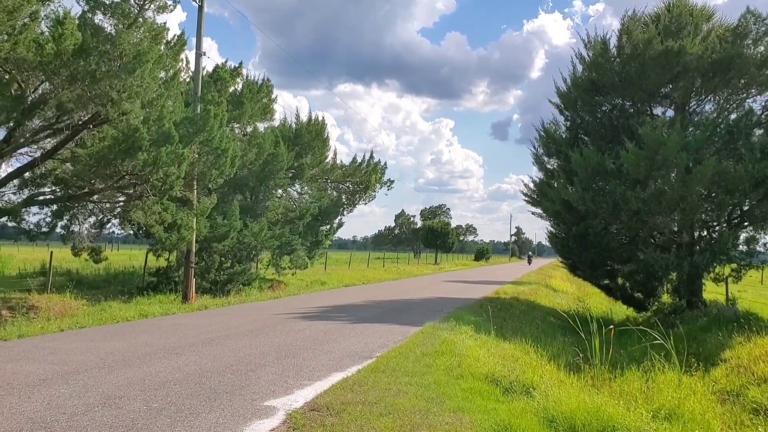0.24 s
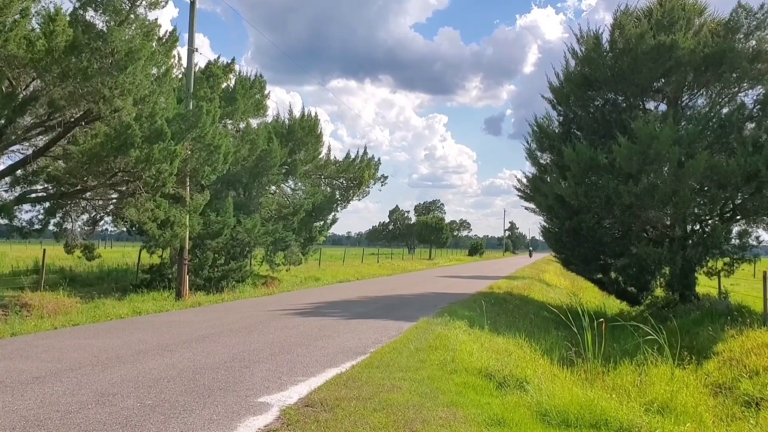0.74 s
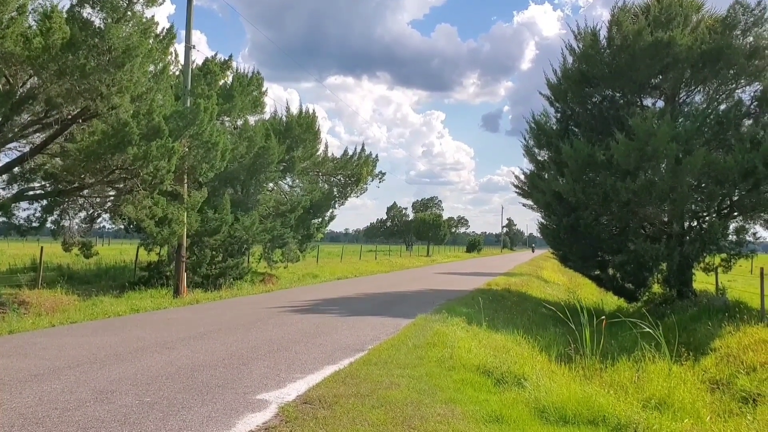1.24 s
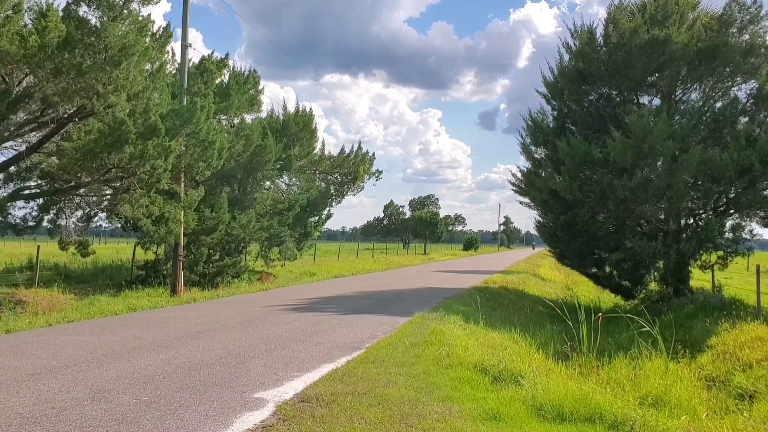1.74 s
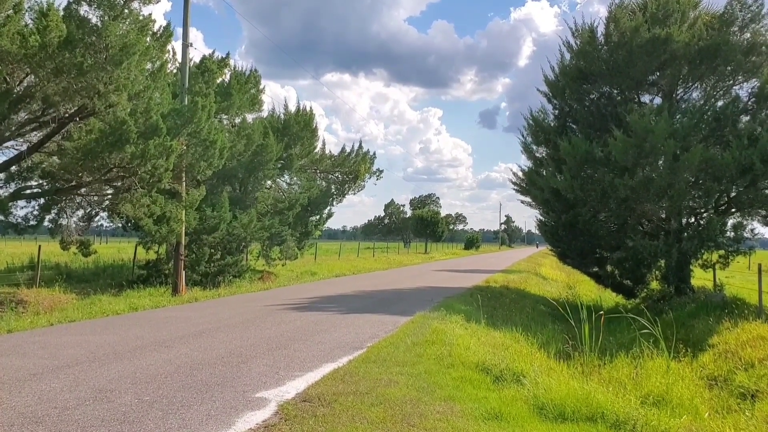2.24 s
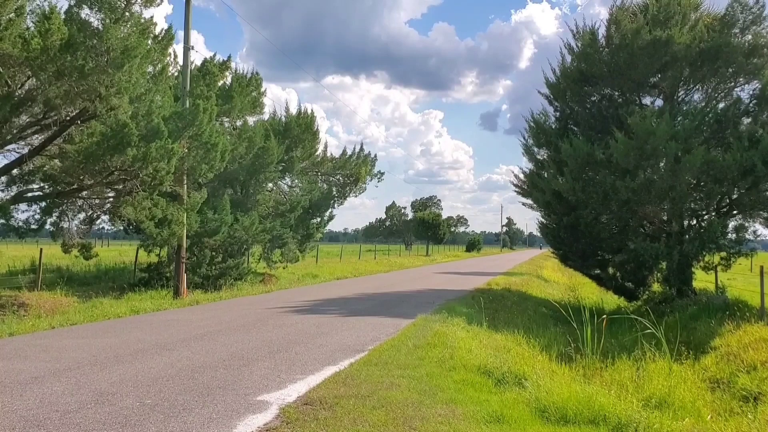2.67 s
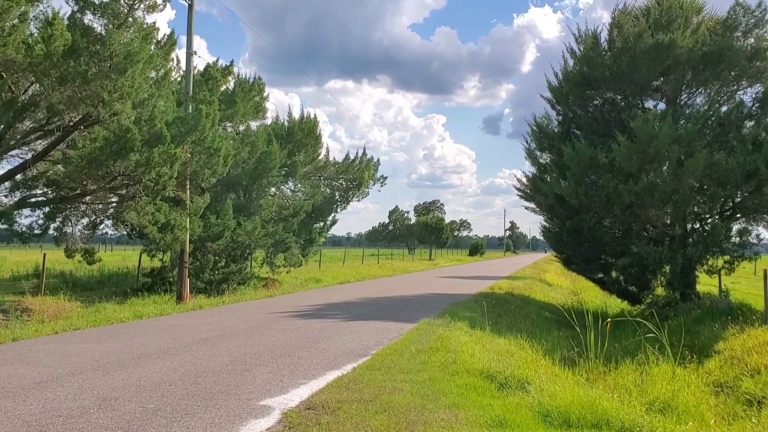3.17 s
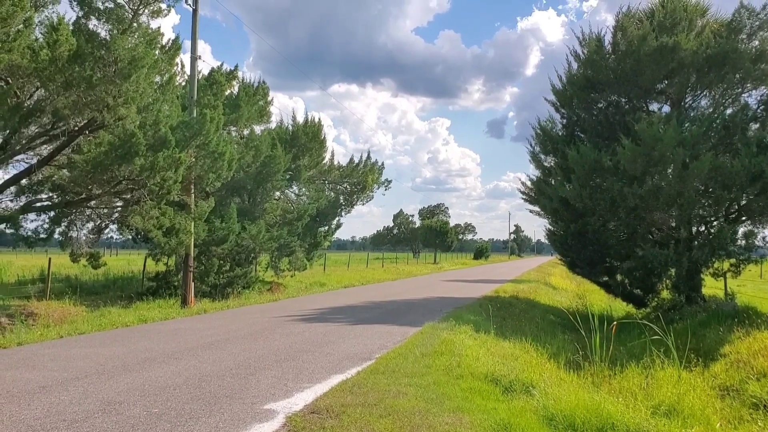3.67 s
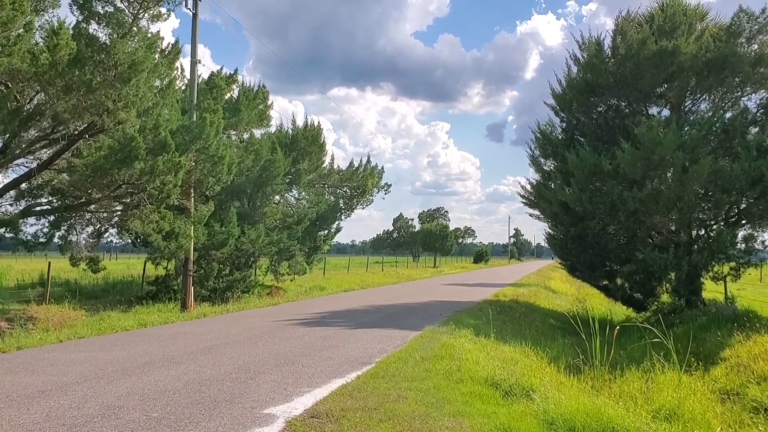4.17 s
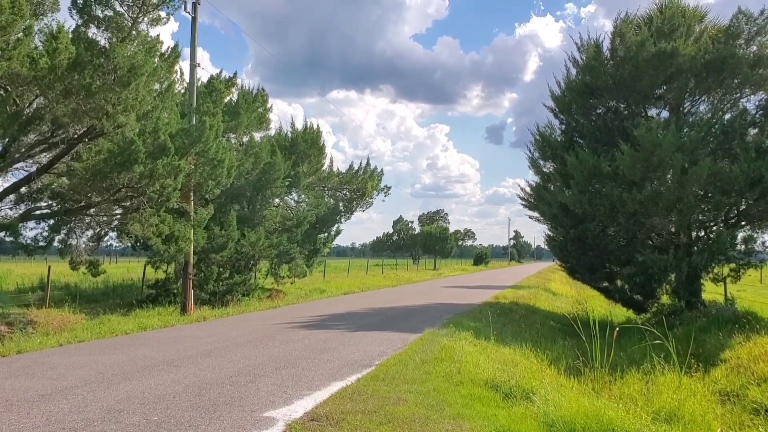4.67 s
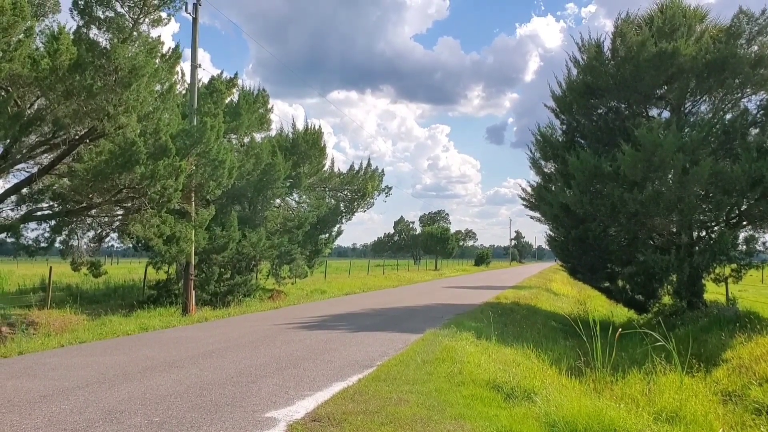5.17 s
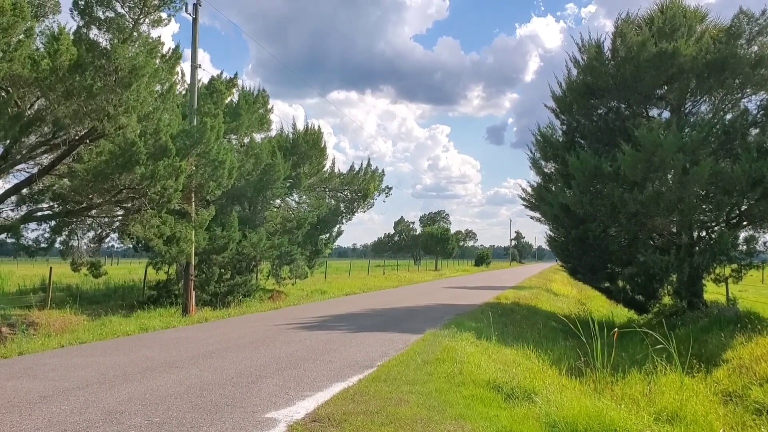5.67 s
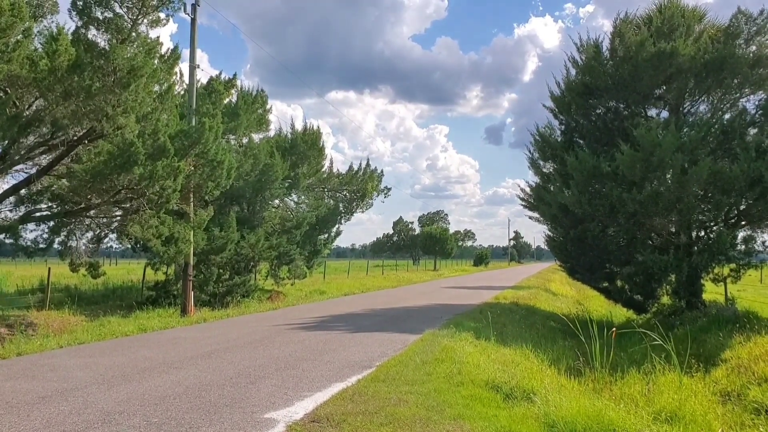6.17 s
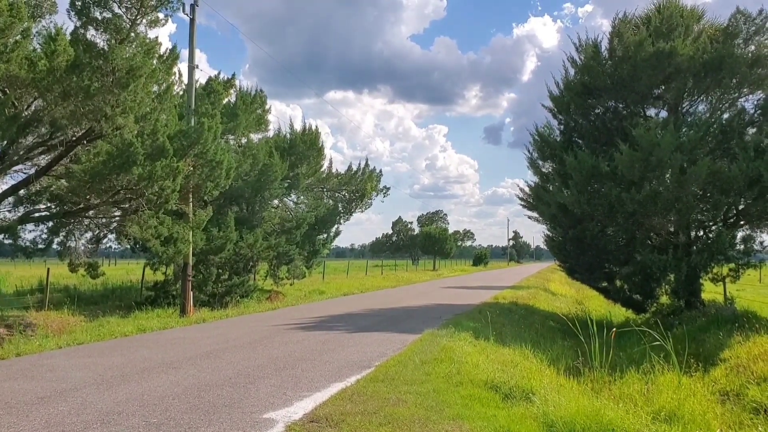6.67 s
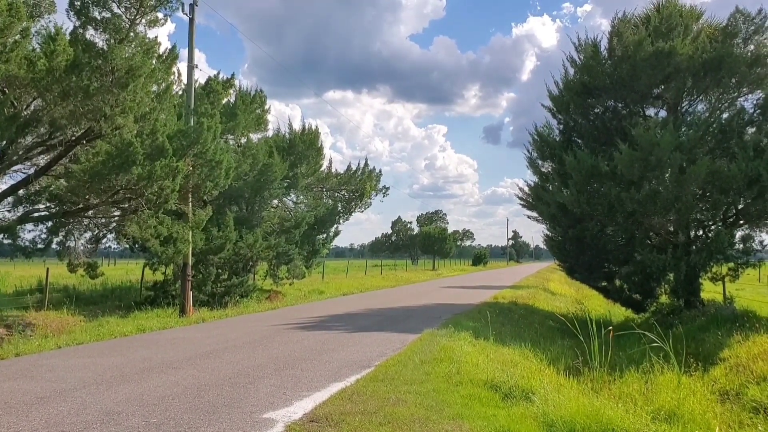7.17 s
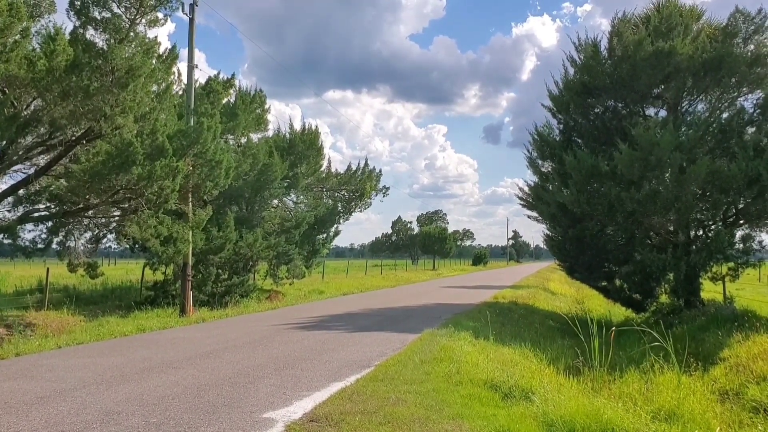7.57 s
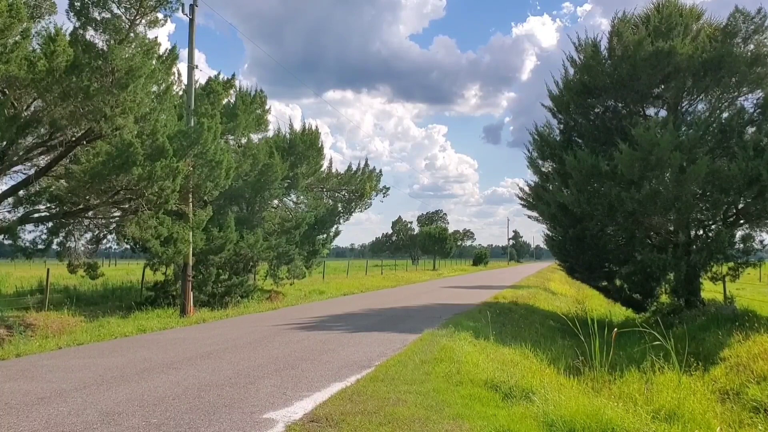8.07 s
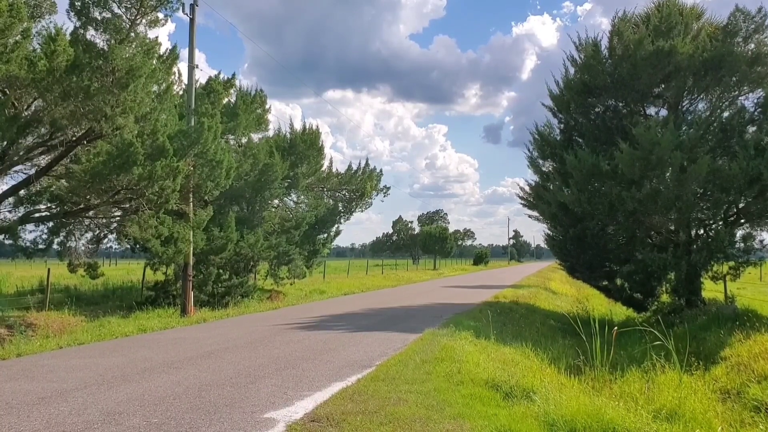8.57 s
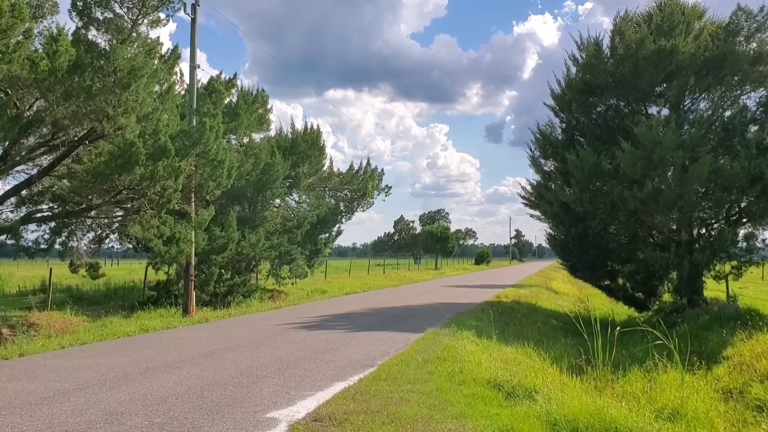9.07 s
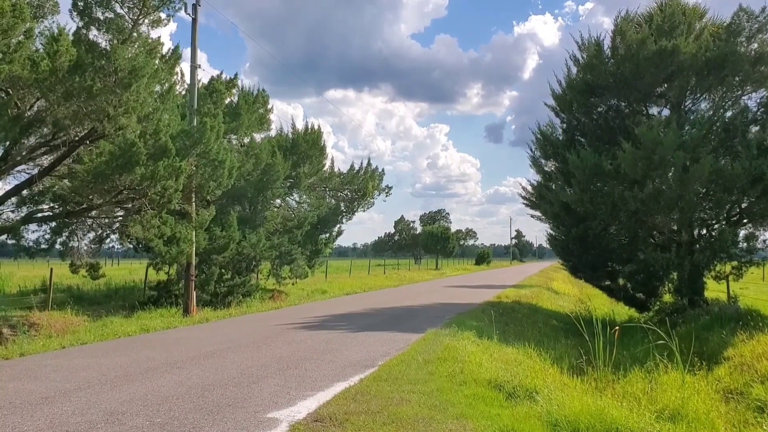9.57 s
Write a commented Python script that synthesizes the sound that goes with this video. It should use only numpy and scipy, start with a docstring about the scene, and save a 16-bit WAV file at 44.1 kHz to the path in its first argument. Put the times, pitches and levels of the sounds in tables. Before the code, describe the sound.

Motorcycle receding on a rural road: brief hard pull, popping overrun, sinking revs and distant burble, with insect buzz, gusts and a few bird whistles.

```python
"""Verge of a country road between trees, two microphone ports, a motorcycle riding away from about 35 m.
The twin pulls for a second, then the throttle shuts and the revs sink: the exhaust burbles and pops, coasts
smoothly and burbles again far off. It is built from drone orders, filtered firing pulses, puffs of noise and pops.
Gusts bump the ports as noise and single pushes; insects buzz in the grass as bands of noise, over faint air,
leaves and hiss; a bird whistles a few notes as gliding sines. The trees return a diffuse noise echo."""
import sys
import numpy as np
from scipy import signal
from scipy.fft import rfft, irfft, next_fast_len
from scipy.io import wavfile
from scipy.ndimage import uniform_filter1d, map_coordinates

SR = 44100
rng = np.random.default_rng(int(sys.argv[2]) if len(sys.argv) > 2 else 0)


def transcribe(signal):
    """Save signal, clipped to [-1, 1], as a 16-bit WAV file at the path in sys.argv[1]."""
    frames = np.atleast_2d(signal).T
    limited = np.clip(frames, -1, 1)
    pcm = np.round(limited * 32767).astype(np.int16)
    wavfile.write(sys.argv[1], SR, pcm)


N = 432621

# Meadow. Spectra of insects and distant air: pitch_hz [Hz], density_db [dB per Hz, relative]
INSECT_SPECTRUM = [(4410, -70), (7500, -44), (8110, -20.5), (8810, -14), (9260, -7), (9610, -1),
                   (10500, 3.5), (11200, -5.5), (11700, -34), (12000, -25.5), (15600, -55), (22000, -120)]
AIR_SPECTRUM = [(20, -9.5), (70, 5.5), (130, -1), (250, -18.5), (420, -31.5), (620, -23), (950, -43),
                (2000, -42.5), (4000, -40.5), (6000, -44.5), (9000, -44)]
# one lower buzzer, leaves and hiss: pitch_hz [Hz], density_db [dB per Hz, relative]
BUZZER_SPECTRUM = [(7600, -42.5), (8400, -6.0), (8850, -1), (9200, -32.5), (9800, -66)]
LEAF_SPECTRUM = [(300, -35.0), (800, -3.5), (3800, -9), (7000, -8.5), (12000, -29.0)]
HISS_SPECTRUM = [(11000, -58.0), (13000, -12.0), (15000, -9.5)]
# insect levels before flutter and panning: time_s [s], level_db [dB]
CHORUS_LEVELS = [(0, -61), (1.5, -59), (3.3, -54.5), (5, -56), (9.8, -57.5)]
BUZZER_LEVELS = [(7, -100), (7.5, -75.5), (8.3, -73.5), (9.8, -76)]

# Decay of the echo among the trees: pitch_hz [Hz], t60_s [s]
TREE_DECAY = [(200, .3), (1500, 0.44), (4000, .4), (10000, 0.068)]
# Bird whistles: start_s [s], length_s [s], start_hz [Hz], end_hz [Hz], peak_db [dB before flutter]
BIRD_NOTES = [(6.296, 0.17, 3316, 3200, -60), (6.457, 0.051, 3306, 3260, -61),
              (6.629, 0.072, 4690, 4570, -69.5), (6.68, 0.11, 4570, 4550, -54.5),
              (6.788, 0.072, 4610, 4540, -57), (6.797, 0.019, 3330, 3280, -63),
              (6.828, 0.097, 3547, 3636, -55), (6.93, 0.062, 2610, 2460, -68),
              (9.64, 0.085, 4990, 4870, -71.5)]

# Wind noise at the ports: pitch_hz [Hz], density_db [dB per Hz, relative]
BUFFET_SPECTRUM = [(15, -37), (35, -5), (65, 5), (100, 1), (150, -12.5), (250, -23.5), (500, -44.5),
                   (1200, -78.5)]
# Gusts on the ports: start_s [s], end_s [s], level_db [dB before flutter], left_minus_right_db [dB]
GUST_SPANS = [(3.34, 3.944, -44, -2), (5.535, 6.747, -42.5, -3.5), (8.905, 9.14, -42, -9)]
GUST_EDGE_DB_PER_S = 124
# Strongest buffets: centre_s [s], half_length_s [s, to 1/e], peak_db [dB], left_minus_right_db [dB]
GUST_BUFFETS = [(3.425, 0.05, -28, -31), (3.514, 0.027, -31, 21), (3.633, 0.048, -29, -36),
                (3.804, 0.056, -36.5, -17), (5.672, 0.028, -30.5, -35), (5.908, 0.031, -31, -13),
                (5.988, 0.035, -31, 13), (6.03, 0.043, -30.5, -21), (6.094, 0.045, -27.5, 22),
                (6.394, 0.021, -39, 4.5), (6.54, .05, -42, -6), (6.727, 0.025, -42, 7),
                (8.97, 0.072, -39, -14)]
# Eddies that hit a port: centre_s [s], peak_db [dB], left_minus_right_db [dB], half_length_s [s, to zero]
EDDY_THUMPS = [(3.41, -19.5, -31, 0.0018), (3.64, -26, -23, 0.0037), (5.658, -25, -22, 0.0048),
               (6.096, -13.5, 32, 0.002), (6.094, -24, 24, 0.00097), (6.135, -18.5, 9, 0.0033),
               (6.383, -21.5, -6, 0.0036), (8.94, -29, -10, 0.0036)]

# The ride away, and what the grass absorbs
START_M, SPEED_M_PER_S, GROUND_DB_PER_M = 35.4, 23.07, 0.08
# Engine cycles, two firings each, before wavering: time_s [s], cycle_hz [Hz]
ENGINE_REVS = [(0, 57.8), (.5, 57.4), (1, 56.4), (2, 52.7), (5.5, 39), (6.3, 38.5), (9, 30), (9.8, 28.2)]
# share by which the revs waver: always, and added at full roughness
WANDER, ROUGH_WANDER = .0005, .0035
# Stages of the ride: start_s [s], burble_db and bark_db [dB as at the starting distance],
# brightness_db [dB, relative], roughness [0-1]
RIDE_STAGES = [ (0, -42, -0.5, 7.5, 0.18), (.52, -38, -1, 2, 0.34), (1.27, -25, 3, -1, 0.9),
               (2.22, -24, 5.5, -8, 0.97), (2.8, -28.5, -0.5, -5, 0.57), (4.2, -31.5, -3.5, -5.5, .52),
               (5.57, -25.5, -11, -9, .7), (7.42, -27, -3, -4.5, 0.77), (8.55, -25, -5.5, -5.5, .8),
               (9.0, -41, -19, -15, .75), ]
CHANGE_S = 0.22  # one stage blends into the next

# Exhaust drone in each engine state: order [multiple of the cycle rate], level_db [dB, relative]
PULL_ORDERS = [(1, -7.5), (2, -11), (3, -2.5), (4, 5), (5, -1.5), (6, -22.5), (7, -18.5), (20, -18.5)]
OVERRUN_ORDERS = [(2, -8), (3, 7), (4, -21), (5, -2.5)]
COAST_ORDERS = [(2, -10), (3, -2), (4, -9), (5, 3), (6, -10), (10, -24), (11, -22), (12, -22), (13, -19),
                (27, -19)]
ROLL_ORDERS = [(5, -2), (6, -4.5), (7, -6), (8, 1)]
FAR_OVERRUN_ORDERS = [(3, -0.5), (4, -7.5), (5, -12.5), (8, -19)]
# When each drone holds: start_s [s], end_s [s], level_db [dB at the starting distance],
# rise [dB per s], fall [dB per s], orders [one of the tables above]
DRONE_SPANS = [ (0, 1.027, -21, 60, 43.5, PULL_ORDERS), (1.374, 1.89, -20.5, 94, 33, OVERRUN_ORDERS),
               (3.128, 5.097, -20.5, 8.5, 18.5, COAST_ORDERS), (6.704, 8.852, -31.5, 14.5, 32, ROLL_ORDERS),
               (7.45, 8.704, -20.5, 130, 19, FAR_OVERRUN_ORDERS), ]
MUFFLER_LAG = .42  # radians times the order squared

# Voices of the exhaust, low to high: pitch_hz [Hz], density_db [dB per Hz, relative]
MUFFLER_SPECTRUM = [(30, -27), (70, -0.5), (130, -1), (200, 5), (290, -1.5), (350, -13), (500, -26),
                    (900, -79)]
PIPE_SPECTRUM = [(280, -48), (390, 3.5), (470, 5), (550, 0.5), (690, 4), (830, -3), (1050, -47)]
RING_SPECTRUM = [(650, -37), (870, -7.5), (990, 4), (1090, 1), (1160, 1.5), (1300, -4.5), (1700, -49.5)]
RASP_SPECTRUM = [(1100, -32.5), (1450, 0), (1800, -1.5), (2200, -1.5), (2500, -5.5), (3000, -46.5)]
SIZZLE_SPECTRUM = [(2000, -39.5), (2550, -8), (2900, -7.5), (3500, -6.5), (4000, -11), (5000, -17),
                   (6300, -15.5), (7600, -27), (15500, -50)]
SPIT_SPECTRUM = [(2800, -28.5), (4300, -0.5), (6300, -1.5), (7600, -14.5), (15500, -37)]
# balance of the bark's voices, dB before brightness and distance
PIPE_DB, RING_DB, RASP_DB, SIZZLE_DB, SPIT_DB = -37, -36.5, -39.5, -41.5, -59.5
# dB of ring and of spit for each dB of brightness
RING_FOLLOWS, SPIT_FOLLOWS = .4, 1.9
# the ring stands out for a while
SWELL_S, SWELL_WIDTH_S, SWELL_DB = 3.15, 1.13, 7.5
# dB for each dB lost to distance: the rasp gains on the other voices, the sizzle fades slightly against them
RASP_CARRIES, SIZZLE_FADES = 0.12, .05
# Surges of the rasp around one pitch: centre_s [s], half_length_s [s, to 1/e], centre_hz [Hz], lift_db [dB]
RASP_FLARES = [(.04, 0.042, 3040, 10), (.19, 0.064, 2100, 8.5), (.42, .08, 2455, 6), (.69, 0.093, 2100, 8),
               (1.7, .1, 3150, 4.5), (2.1, 0.095, 3150, 6.5), (3.3, 0.34, 3130, 6.5),
               (4.2, 0.048, 3220, 13), (4.5, .12, 2750, 12), (4.98, 0.055, 2200, 8.5), (7.7, .3, 1960, 5.5),
               (8.28, 0.27, 1340, 20.5)]
FLARE_OCTAVES = 0.2

# Unburnt fuel pops in the pipe: start_s [s], thud_db [dB, relative], snap_db [dB, relative]
FUEL_POPS = [(1.421, -23.5, -21.5), (1.448, -22, -19), (1.933, -21, -36), (1.979, -28, -35),
             (2.191, -24.5, -21.5), (2.326, -25.5, -33), (2.532, -20.5, -34), (2.58, -22, -38),
             (2.678, -24, -32), (2.814, -29.5, -35), (7.71, -48, -53), (7.871, -44, -45),
             (7.91, -42.5, -43)]
POP_T60_S = 0.029
# Spectra of the pops: pitch_hz [Hz], gain_db [dB, relative]
THUD_SPECTRUM = [(100, -1), (200, 3), (400, -1), (750, -14), (1080, 6.5), (1500, -5.5), (2300, -7.5),
                 (4000, -41), (9000, -67)]
SNAP_SPECTRUM = [(1000, -33), (2300, 1), (3400, -1), (4500, -18), (9000, -46), (14000, -68)]

# Echo at the start; dB gained on the direct sound for each dB lost to distance
ECHO_DB, ECHO_GROWS = -10, 0.23
TOP_HZ = 15800


def amp(db):
    """Decibels to gain."""
    return 10 ** (np.asarray(db) / 20)


def unit(x):
    """Scaled to rms 1."""
    return x / np.sqrt(np.mean(x ** 2) + 1e-20)


def along(points, hz):
    """Interpolate (Hz, value) points on a log frequency axis."""
    f, v = np.transpose(points)
    return np.interp(np.log(hz + 1), np.log(f + 1), v)


def curves(rows):
    """One value per sample for each column after the time."""
    s, *cols = np.transpose(rows)
    return [np.interp(np.arange(N) / SR, s, c) for c in cols]


def held(start, end, rise, fall):
    """Attack, hold and release in dB; rise and fall in dB per second."""
    t = np.arange(N) / SR
    return np.minimum(0, np.minimum((t - start) * rise, (end - t) * fall))


def wobble(rate):
    """A smooth random curve, rate knots a second."""
    knots = rng.standard_normal(int(N * rate / SR) + 4)
    return map_coordinates(knots, [np.arange(N) * rate / SR])


def filtered(x, response):
    """x times a complex response of frequency."""
    m = next_fast_len(N + SR // 2)
    return irfft(rfft(x, m) * response(np.fft.rfftfreq(m, 1 / SR)), m)[..., :N]


def coloured(x, spectrum, size=8192):
    """x through a causal, minimum-phase filter with the given spectrum."""
    gain = amp(along(spectrum, np.fft.rfftfreq(size, 1 / SR)))
    # folding the cepstrum puts all the ringing after the pulse
    cepstrum = irfft(np.log(gain))
    cepstrum[1:size // 2] *= 2
    cepstrum[size // 2 + 1:] = 0
    ring = irfft(np.exp(rfft(cepstrum)))
    return filtered(x, lambda hz: rfft(ring, 2 * (len(hz) - 1)))


def pair(spectrum, side_db):
    """Stereo noise of rms 1; side_db sets the width."""
    mid, side = coloured(rng.standard_normal((2, N)), spectrum)
    side = amp(side_db) * side
    return unit(np.array([mid + side, mid - side]))


def panned(db):
    """Left and right gains of mean 1 for an L-R difference."""
    gains = amp([db / 2, -db / 2]).reshape(2, -1)
    return gains / gains.mean(axis=0)


def smear(t60):
    """A dense train of dying reflections spreads a pulse in time with little colouring."""
    t = np.arange(SR // 10) / SR
    response = rng.standard_normal(len(t)) * amp(-60 * t / t60)
    # flatten the spectrum, trim, repeat
    for _ in range(3):
        z = rfft(response, 2 * len(t))
        response = irfft(z / np.abs(z))[:len(t)]
    return response


def meadow():
    """A chorus of insects, one lower buzzer that joins late, distant air, leaves and faint hiss."""
    chorus_db, = curves(CHORUS_LEVELS)
    chorus_db = chorus_db + 0.54 * wobble(25) + .25 * wobble(8)
    chorus = amp(chorus_db) * pair(INSECT_SPECTRUM, side_db=0.5) * panned(2)
    buzzer_db, = curves(BUZZER_LEVELS)
    buzzer = amp(buzzer_db) * pair(BUZZER_SPECTRUM, side_db=-7.0)
    # only the left microphone hisses
    hiss = amp(-62) * unit(coloured(rng.standard_normal(N), HISS_SPECTRUM)) * np.array([[1], [0]])
    air = amp(-53.0 + 1.4 * wobble(8.3)) * pair(AIR_SPECTRUM, side_db=-10)
    leaves = amp(-77.5) * pair(LEAF_SPECTRUM, side_db=3.5)
    return chorus + buzzer + hiss + air + leaves


def trees(x):
    """Diffuse stereo echo from the trees, which scatter little bass."""
    hz, t, z = signal.stft(rng.standard_normal((2, SR // 2)), SR, nperseg=256)
    decay = amp(-60 * t / along(TREE_DECAY, hz)[:, None])
    tail = signal.istft(z * decay, SR, nperseg=256)[1]
    echo = signal.fftconvolve(x[None], tail / np.linalg.norm(tail[0]), axes=1)[:, :N]
    return filtered(echo, lambda hz: hz / (hz + 700))


def bird():
    """Gliding, fluttering whistles that linger among the trees."""
    song = np.zeros(N + SR)
    for s, length, start_hz, end_hz, db in BIRD_NOTES:
        u = np.linspace(0, 1, int(length * SR))
        phase = 2 * np.pi * np.cumsum(start_hz + (end_hz - start_hz) * u) / SR
        song[round(s * SR):][:len(u)] += amp(db) * np.sin(np.pi * u) * np.sin(phase)
    flutter = amp(1.8 * wobble(70) + 2.2 * wobble(500))
    song = song[:N] * flutter
    return song + amp(0.5) * trees(song)


def wind():
    """Gusts buffet each port on its own; single eddies give a soft push."""
    force, t = np.zeros((2, N)), np.arange(N) / SR
    for start, end, db, pan_db in GUST_SPANS:
        gust_db = db + held(start, end, GUST_EDGE_DB_PER_S, GUST_EDGE_DB_PER_S)
        force += amp(gust_db) * panned(pan_db)
    force *= amp(3 * np.array([wobble(8.1), wobble(18)]))
    for s, length, db, pan_db in GUST_BUFFETS:
        force += amp(db) * panned(pan_db) * np.exp(-((t - s) / length) ** 2)
    out = force * pair(BUFFET_SPECTRUM, side_db=-3.5)
    for s, db, pan_db, length in EDDY_THUMPS:
        u = (t - s) / length
        push = (1 - u * u) * np.exp(-u * u / 2)
        out += amp(db) * panned(pan_db) * push
    return out


def distance_db():
    """Level change as the bike recedes: spreading plus loss over the grass."""
    travelled = SPEED_M_PER_S * np.arange(N) / SR
    return -20 * np.log10(1 + travelled / START_M) - GROUND_DB_PER_M * travelled


def stages():
    """Burble dB, bark dB, brightness dB and roughness at each sample."""
    start, *cols = np.transpose(RIDE_STAGES)
    now = np.searchsorted(start[1:], np.arange(N) / SR)
    return [uniform_filter1d(c[now], int(CHANGE_S * SR)) for c in cols]


def firings(cycles, scatter_db, jitter):
    """One pulse per firing; two unequal cylinders fire unevenly spaced, jitter in seconds."""
    second_cylinder = .385  # share of a cycle after the first
    turns = (np.arange(int(cycles[-1]))[:, None] + [0, second_cylinder]).ravel()
    chance = rng.standard_normal((len(turns), 2))
    at = np.interp(turns, cycles, np.arange(N)) + jitter * SR * chance[:, 0]
    strength = amp(scatter_db * np.clip(chance[:, 1], -2, 1.5)) * np.resize([1, .55], len(turns))
    # a short sinc places each pulse between samples
    taps = at.astype(int)[:, None] + np.arange(-7, 9)
    pulses = strength[:, None] * np.sinc(taps - at[:, None])
    return np.bincount(np.clip(taps, 0, N - 1).ravel(), pulses.ravel(), N)


def drone(cycles, rough):
    """The exhaust's orders of the cycle rate; their balance changes with the engine's state."""
    out = np.zeros(N)

    def beat(k):
        """The muffler delays the higher orders more, which rounds each beat."""
        return np.sin(2 * np.pi * k * cycles - MUFFLER_LAG * k * k)

    for start, end, level_db, rise, fall, orders in DRONE_SPANS:
        tone = np.zeros(N)
        for k, db in orders:
            # the higher orders waver most
            waver_db = .5 * np.sqrt(k) * rough * wobble(10)
            tone += amp(db + waver_db) * beat(k)
        out += amp(level_db + held(start, end, rise, fall)) * unit(tone)
    return out


def burble(cycles):
    """Firings of uneven strength roll through the muffler's chambers."""
    pulses = firings(cycles, scatter_db=2.0, jitter=.003)
    thuds = signal.fftconvolve(pulses, smear(t60=0.3))[:N]
    return unit(coloured(thuds, MUFFLER_SPECTRUM))


def patchy(x, depth_db, flares=()):
    """Moving air makes patches of the spectrum swell and fade; each flare lifts one narrow band."""
    hz, t, z = signal.stft(x, SR, nperseg=1024)
    patch = np.outer(np.hanning(13), np.hanning(23))
    field = signal.fftconvolve(rng.standard_normal(z.shape), patch, 'same')
    gain_db = depth_db * unit(field)
    for s, length, centre_hz, db in flares:
        band = np.exp(-(np.log2((hz + 1) / centre_hz) / FLARE_OCTAVES) ** 2)
        gain_db = gain_db + db * np.outer(band, np.exp(-((t - s) / length) ** 2))
    return signal.istft(z * amp(gain_db), nperseg=1024)[1][:N]


def bark(cycles, bright_db, rough):
    """Each firing rings the pipe and puffs turbulent gas; rough running gives more puff than ring."""
    t = np.arange(SR // 20) / SR
    clean_pulses = firings(cycles, scatter_db=2, jitter=.00001)
    clean = unit(signal.fftconvolve(clean_pulses, smear(t60=0.065))[:N])
    even = firings(cycles, scatter_db=7, jitter=.0003)
    uneven = firings(cycles, scatter_db=5.5, jitter=0.0023)
    puff_pulses = (1 - rough ** 2) * even + rough ** 2 * uneven
    gate = signal.fftconvolve(puff_pulses, amp(-60 * t / 0.081))[:N]
    puffs = unit((unit(gate) + 0.2) * rng.standard_normal(N))

    def voice(spectrum, share):
        """Ring and puff in one band; share is the puff's part of the power."""
        return unit(coloured(np.sqrt(1 - share) * clean + np.sqrt(share) * puffs, spectrum))

    swell_db = SWELL_DB * np.exp(-((np.arange(N) / SR - SWELL_S) / SWELL_WIDTH_S) ** 2)
    ring_db = RING_DB + RING_FOLLOWS * bright_db + swell_db
    # the low voices stay tonal longest, the high ones turn to noise first
    pipe = amp(PIPE_DB) * voice(PIPE_SPECTRUM, rough ** 1.6)
    ring = amp(ring_db) * voice(RING_SPECTRUM, rough ** 1.6)
    far_db = distance_db()
    rasp = amp(RASP_DB - RASP_CARRIES * far_db) * voice(RASP_SPECTRUM, rough)
    sizzle = amp(SIZZLE_DB + SIZZLE_FADES * far_db) * voice(SIZZLE_SPECTRUM, np.sqrt(rough))
    # the top edge grows fastest with brightness
    spit = amp(SPIT_DB + SPIT_FOLLOWS * bright_db) * unit(coloured(puffs, SPIT_SPECTRUM))
    body = patchy(pipe + ring, depth_db=2.02)
    edge = amp(bright_db) * patchy(rasp + sizzle, depth_db=2.5, flares=RASP_FLARES)
    sputter = amp(0.56 * rough * wobble(16))
    return sputter * (body + edge + spit)


def pops():
    """Afterfire in the hot pipe: a dull thud and a bright snap."""
    thuds, snaps = np.zeros((2, N + SR))
    for s, thud_db, snap_db in FUEL_POPS:
        crack = smear(t60=POP_T60_S)
        crack = crack / np.abs(crack).max()
        thuds[round(s * SR):][:len(crack)] += amp(thud_db) * crack
        snaps[round(s * SR):][:len(crack)] += amp(snap_db) * crack
    return amp(13.5) * coloured(thuds, THUD_SPECTRUM) + amp(10) * coloured(snaps, SNAP_SPECTRUM)


def motorcycle():
    """The whole engine, slightly to the right; its echo gains on the direct sound as it recedes."""
    burble_db, bark_db, bright_db, rough = stages()
    rough, far_db = np.clip(rough, 0, 1), distance_db()
    waver = 1 + (WANDER + ROUGH_WANDER * rough ** 2) * wobble(12)
    cycles = np.cumsum(curves(ENGINE_REVS)[0] * waver) / SR
    sharp = amp(far_db + bark_db) * bark(cycles, bright_db, rough) + pops()
    low = drone(cycles, rough) + amp(burble_db) * burble(cycles)
    direct = sharp + amp(far_db) * low
    lag = .00008  # s between the ports, the right one first
    ports = filtered(direct, lambda hz: np.exp(1j * np.pi * hz * lag * np.array([[-1], [1]])))
    echo = trees(amp(ECHO_DB - ECHO_GROWS * far_db) * sharp)
    return (ports + echo) * panned(-0.32)


def scene():
    """Everything at the roadside, from the meadow to the motorcycle."""
    return meadow() + bird() + wind() + motorcycle()


def record(dry):
    """The microphone chain keeps nothing above its band limit."""
    return filtered(dry, lambda hz: hz < TOP_HZ)


dry = scene()
out = record(dry)
transcribe(out)
```